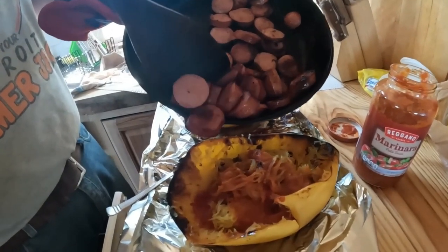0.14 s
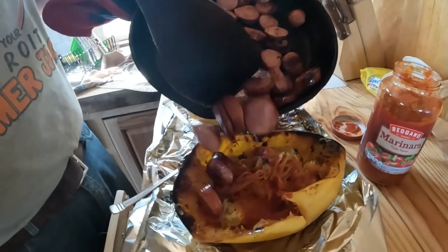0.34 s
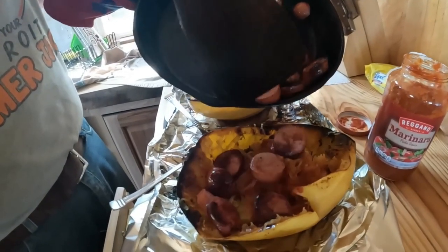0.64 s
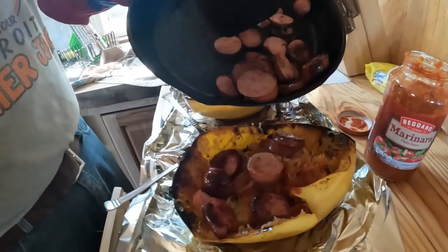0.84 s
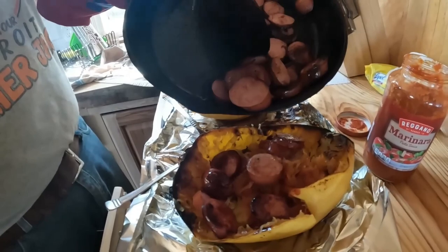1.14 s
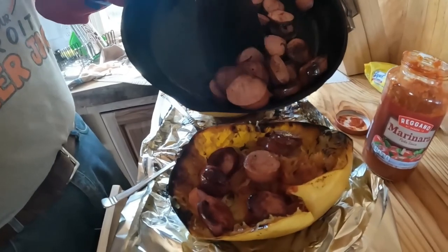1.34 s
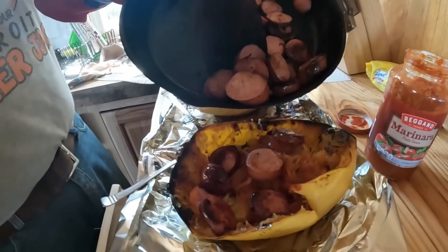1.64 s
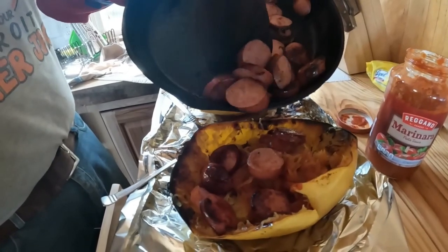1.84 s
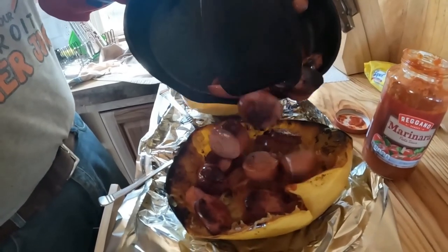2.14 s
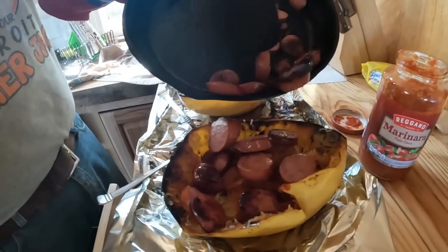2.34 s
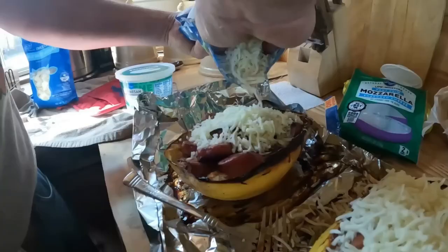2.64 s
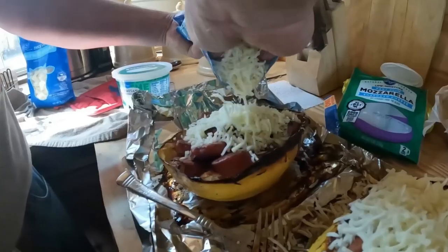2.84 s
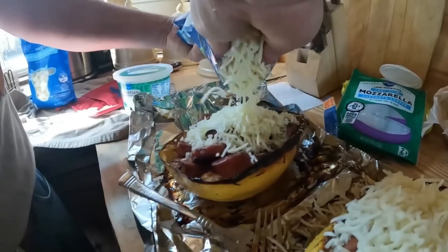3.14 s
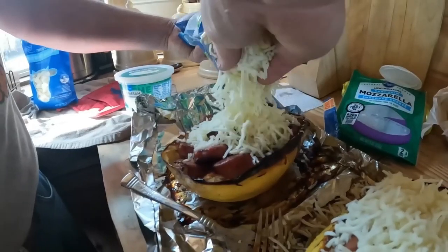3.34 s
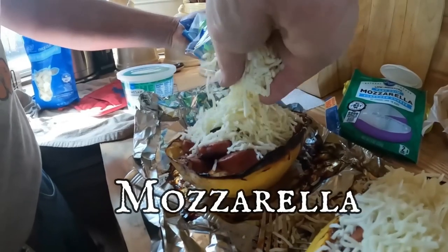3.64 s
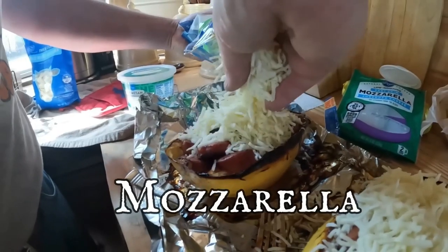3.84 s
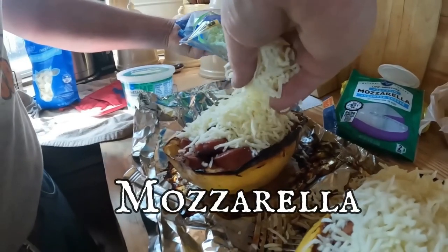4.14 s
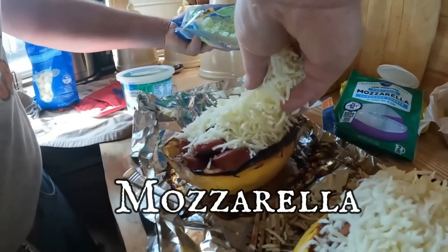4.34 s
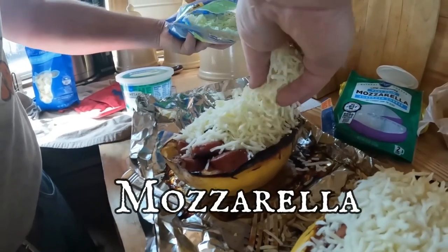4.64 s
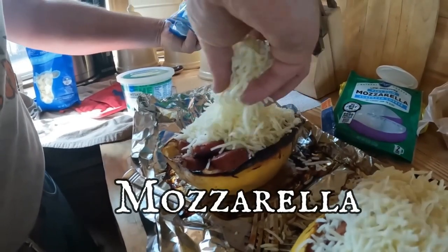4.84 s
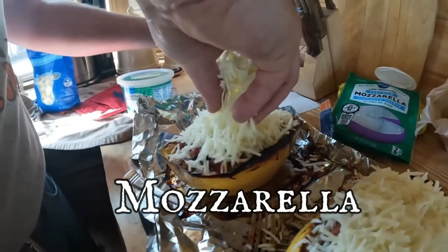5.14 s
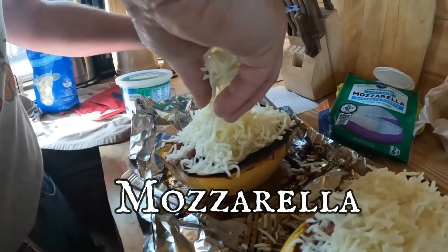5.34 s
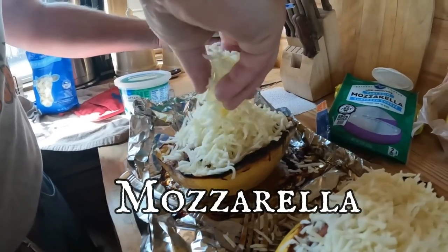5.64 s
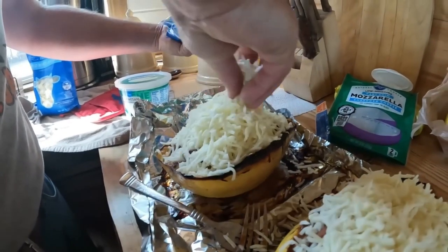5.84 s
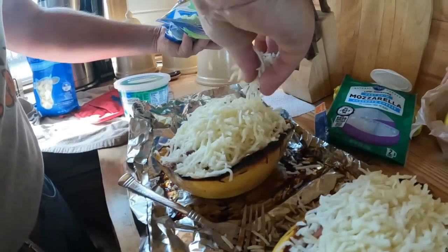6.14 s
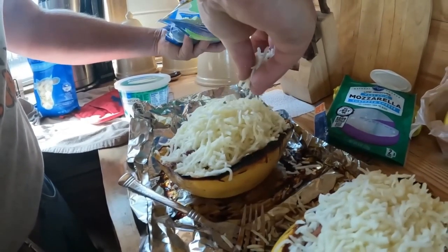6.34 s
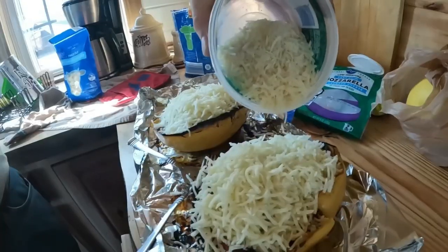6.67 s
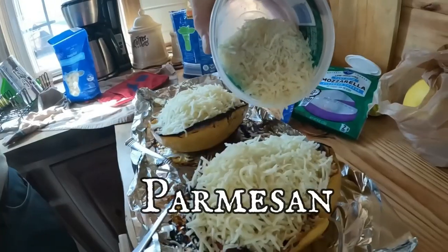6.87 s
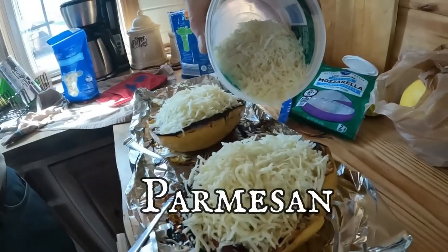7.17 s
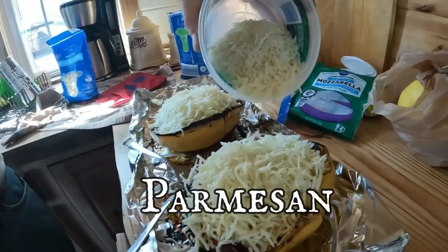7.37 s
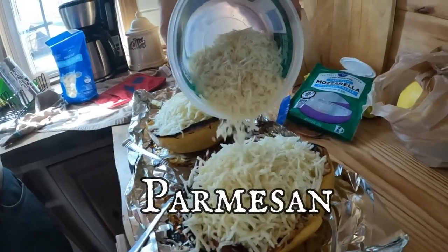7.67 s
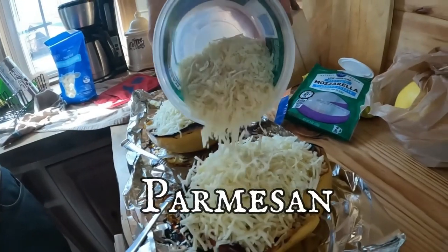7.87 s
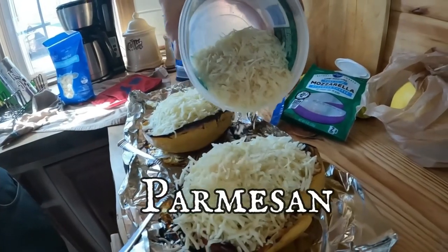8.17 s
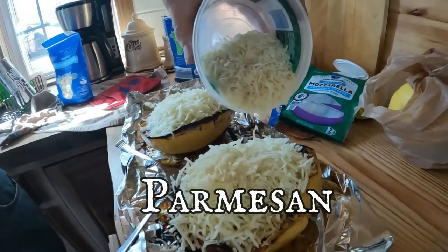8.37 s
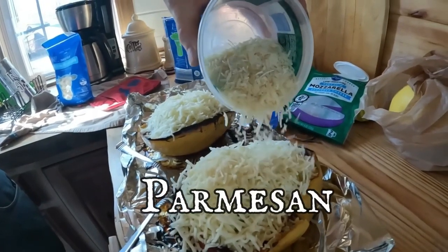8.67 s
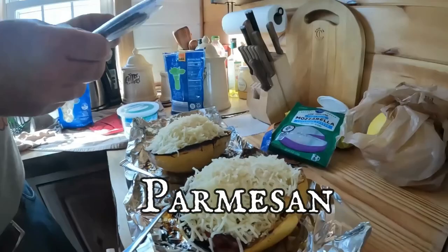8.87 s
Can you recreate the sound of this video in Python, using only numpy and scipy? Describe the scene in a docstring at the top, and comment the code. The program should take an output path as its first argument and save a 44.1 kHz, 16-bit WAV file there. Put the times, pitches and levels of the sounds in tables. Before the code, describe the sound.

Brief scrapes and ticks of a spoon in a pan come first, dry and slightly metallic, with one loud hollow knock. Then a hand works in a crinkly bag, giving busy mid-pitched snaps and papery rustle above foil. The crumpling stops, leaving near quiet, a heavy soft counter boom, and scattered crinkles. Recorded very close in stereo, with a short dry kitchen tail and soft low room rumble.

```python
"""Hands crumple a cheese bag over crinkly foil while, in the first seconds, a spoon scrapes and knocks a pan on
a kitchen counter. Snaps, of creases and of one spoon knock, are clicks that ring small facets; strokes rustle
as clumps of tiny slips plus hiss. Rubbing keeps the pan's modes humming; knocks, clangs and bumps are dying
modes of spoon, pan and counter. A short room tail, a wavering low rumble and still air lie underneath."""
import sys
import numpy as np
from scipy import signal
from scipy.fft import rfft, irfft
from scipy.io import wavfile

SR = 44100
rng = np.random.default_rng(int(sys.argv[2]) if len(sys.argv) > 2 else 0)


def unload_audio(sound):
    """Save the sound as a 16-bit wav file, at the path given as the first command line argument."""
    columns = np.transpose(np.atleast_2d(sound))
    # keep every value between -1 and 1, then stretch to whole-number steps
    steps = np.round(np.clip(columns, -1, 1) * 32767)
    wavfile.write(sys.argv[1], SR, steps.astype(np.int16))


def voltage_ratio(decibels):
    """Convert decibels (scalar or array-like) to amplitude ratios, 20 dB per decade."""
    exponent = np.asarray(decibels, float) / 20
    return 10 ** exponent


N = 397341
T = np.arange(N) / SR


def evened(x):
    """Scales to rms 1."""
    return x / np.sqrt(np.mean(x ** 2) + 1e-20)


def read(points, hz):
    """Reads a spectrum table on a log-frequency axis."""
    f, value = np.transpose(points)
    return np.interp(np.log(hz + 1), np.log(f + 1), value)


def add(mix, s, sound):
    """Mixes a sound in at s seconds."""
    part = mix[..., max(round(s * SR), 0):][..., :sound.shape[-1]]
    part += sound[..., :part.shape[-1]]


def registers(x):
    """Splits into body, middle and treble."""
    edges = [((400, 800), "band"), ((700, 4000), "band"), (4000, "high")]  # Hz
    return [signal.sosfilt(signal.butter(3, hz, kind, fs=SR, output="sos"), x) for hz, kind in edges]


def resonate(x, hz, width):
    """Resonance of gain 1 and a width in Hz, on a fixed or moving centre."""
    turn = np.exp(2j * np.pi * np.cumsum(hz * np.ones(x.shape[-1])) / SR)
    r = np.exp(-np.pi * width / SR)
    # shift the centre down to 0 Hz, smooth there, shift back up
    return 2 * (turn * signal.lfilter([1 - r], [1, -r], x / turn)).real


def struck(modes, tilt_db, contact):
    """Dying modes, tilted in dB an octave about 700 Hz, that build up over the contact time; peak 1."""
    t = T[:SR // 2]
    ring = np.zeros(len(t))
    for hz, db, t60 in modes:
        decay = voltage_ratio(db + tilt_db * np.log2(hz / 700) - 60 * t / t60)
        ring += decay * np.sin(2 * np.pi * hz * t)
    ring *= 1 - np.exp(-t / contact)
    return ring / abs(ring).max()


# How alike noise is in the two channels. Each row: frequency in Hz, likeness from 0 to 1.
LIKENESS = [(60, 0.97), (240, 0.19), (950, 0.1), (3770, 0.99), (15000, 0.6)]


def pair(points):
    """Two-channel noise of a given colour and rms 1; left and right are alike to a degree set by pitch."""
    hz = np.fft.rfftfreq(N, 1 / SR)
    a, b = rfft(rng.standard_normal((2, N)))
    same = np.clip(read(LIKENESS, hz), 0, 1)
    right = same * a + np.sqrt(1 - same ** 2) * b
    return evened(irfft(voltage_ratio(read(points, hz)) * np.array([a, right]), N))


# Colour of the still air. Each row: frequency in Hz, relative density in dB per Hz.
AIR_COLOUR = [(41, -29), (70, -9), (113, -9), (207, -7.5), (291, -2.5), (768, -30), (1050, -22),
              (2070, -35), (2850, -34.5), (3120, -39), (6720, -44), (12900, -47.5), (15500, -78)]


def still_air():
    """Steady faint noise at a fixed rms level."""
    return voltage_ratio(-59.5) * pair(AIR_COLOUR)


# Level of the rumble over time. Each row: time in seconds, rms level in dB before the waver.
RUMBLE_LEVEL = [(0.0, -41.5), (0.48, -48.5), (0.7, -41.5), (1.33, -47.5), (1.55, -48.5), (1.81, -48.5),
                (2.43, -50), (2.78, -44), (4.04, -54), (4.54, -50), (6.5, -52), (6.73, -45), (7.3, -54.5),
                (7.5, -41), (7.68, -42.5), (7.88, -49), (8.08, -45), (8.28, -52), (8.51, -48.5),
                (9.01, -48)]
# Colour of the rumble. Each row: frequency in Hz, relative density in dB per Hz.
RUMBLE_COLOUR = [(4.7, -16), (8.0, 2.5), (16, -3), (26, -7), (51, -9), (81, -38.5), (120, -35.5),
                 (160, -66.5), (260, -120)]


def rumble():
    """Low room rumble whose level wavers with a sum of slow sines from 1 to 8 Hz."""
    waver = np.zeros(N)
    for f in np.geomspace(1, 8, num=16):
        waver += np.sin(2 * np.pi * (f * T + rng.random())) / np.sqrt(f)
    waver_db = 2.5 * evened(waver)
    return voltage_ratio(np.interp(T, *np.transpose(RUMBLE_LEVEL)) + waver_db) * pair(RUMBLE_COLOUR)


def room(x):
    """Short kitchen tail from sparse taps of random sign, different left and right."""
    at = np.arange(120, SR // 3, 20)
    places = at + rng.integers(0, 20, (2, len(at)))
    signs = rng.choice([-1., 1.], (2, len(at)))
    taps = np.zeros((2, SR // 3 + 20))
    np.put_along_axis(taps, places, signs, 1)
    taps *= voltage_ratio(-60 * T[:taps.shape[1]] / 0.12)  # t60 0.12 s
    return signal.oaconvolve(x, taps / np.linalg.norm(taps[0]), axes=1)[:, :N]


# Modes of the counter. Each row: frequency in Hz, level in dB before the tilt, t60 in seconds.
COUNTER_MODES = [(41.8, 9.5, 0.29), (59.26, 2.5, 0.58), (94.9, 1, 0.33), (137.3, -1.5, 0.34),
                 (177.6, -18, 0.37), (207, -18, 0.27), (247, -29, 0.073)]
# Bumps against the counter. Each row: start in seconds, peak in dB, contact time in seconds,
# tilt in dB an octave.
BUMPS = [(1.44, -40, 0.002, 20), (2.799, -36.5, 0.0017, 19), (3.318, -36.5, 0.0032, 23),
         (3.336, -45, 0.0034, 22), (3.464, -34.5, 0.0043, 24), (3.798, -41.5, 0.0071, 19),
         (4.757, -42.5, 0.0055, 6), (7.71, -15.5, 0.01, 5.5), (7.736, -10.5, 0.0028, 3.5),
         (7.916, -24, 0.02, 1), (8.484, -33, 0.011, -7.5)]


def bumps():
    """The counter booms in its low modes when bumped, pushed the opposite way to the other blows."""
    out = np.zeros(N)
    for s, db, contact, tilt_db in BUMPS:
        add(out, s, -voltage_ratio(db) * struck(COUNTER_MODES, tilt_db, contact))
    return out


# Modes of the pan. Each row: frequency in Hz, level in dB, t60 in seconds when ringing freely.
PAN_MODES = [(980, -11.5, 0.33), (1460, 1, .12), (1710, -17, 0.34), (2515, 0.5, 0.055), (2950, -1, 0.096),
             (3740, -8.5, 0.17), (4650, -22.5, 0.14), (4430, -24, 0.28), (5500, -10.5, 0.28),
             (5400, -25, .1)]
# The pan set ringing. Each row: start in seconds, peak in dB, tilt in dB an octave,
# contact time in seconds.
CLANGS = [(0.429, -45, 0.5, 0.0052), (0.594, -48, 5, 0.0013), (1.16, -45, 4, 0.0022),
          (1.524, -33, -4, 0.00076), (2.0, -58, 21, 0.015), (2.079, -51, -9, 0.011),
          (2.652, -35.5, -3.5, 0.024)]


def clangs():
    """The pan rings freely in its own modes."""
    out = np.zeros(N)
    for s, db, tilt_db, contact in CLANGS:
        add(out, s, voltage_ratio(db) * struck(PAN_MODES, tilt_db, contact))
    return out


# Modes of the wooden spoon. Each row: frequency in Hz, level in dB before the tilt,
# t60 in seconds before the grip.
SPOON_MODES = [(565, 15, 0.075), (532, -6.5, 0.31), (629, -45, 0.034), (1010, 11.5, 0.062),
               (1070, -5, 0.079), (2480, -28, 0.022)]
# Spoon knocks. Each row: start in seconds, peak in dB, tilt in dB an octave,
# contact time in seconds, looseness of grip as a factor on t60.
KNOCKS = [(1.3616, -11.5, 9.5, 0.00061, 0.88), (1.5243, -33, -13, 0.0008, 2.7)]


def knocks():
    """The wooden spoon knocks; a looser grip lets its modes ring longer."""
    out = np.zeros(N)
    for s, db, tilt_db, contact, loose in KNOCKS:
        add(out, s, voltage_ratio(db) * struck(np.array(SPOON_MODES) * [1, 1, loose], tilt_db, contact))
    return out


def scrape(rubbing):
    """While the spoon works the pan, the rubbing keeps the pan's modes humming, damped by the food."""
    end_s, hum_db = 2.76, 2.5  # the pan is put away at end_s
    food_damping = 3.76  # resonance width in Hz times free t60; undamped would be 2.2
    held = rubbing.mean(0) * (T < end_s)
    hum = sum(voltage_ratio(db) * resonate(held, hz, food_damping / t60) for hz, db, t60 in PAN_MODES)
    return voltage_ratio(hum_db) * hum


# Colour of the crumpled sheet. Each row: frequency in Hz, level in dB per Hz.
SHEET_COLOUR = [(71, -41), (120, 8), (271, 11), (398, -9), (441, -11.5), (704, -14.5), (917, -1.5),
                (1430, -2.5), (4570, -5.5), (4860, -5.5), (7300, -13), (13400, -31), (15500, -43.5)]


def sheet_response():
    """Minimum-phase impulse response of the sheet: its colour with no ringing ahead of the hit."""
    level_db = np.maximum(read(SHEET_COLOUR, np.fft.rfftfreq(4096, 1 / SR)), -100)
    half = np.log(voltage_ratio(level_db))
    full = np.r_[half, half[-2:0:-1]]
    return np.fft.ifft(np.exp(full - 1j * signal.hilbert(full).imag)).real[:2048]


IDLE_HZ, IDLE_TREBLE_DB = 1250, -6.5  # hollow and treble of the sheet between strokes
# Faint shifting between strokes. Each row: time in seconds, effort in dB.
IDLE_EFFORT = [(0, -67), (.8, -79), (1.1, -78), (1.5, -62), (2.6, -70), (3.0, -60.5), (5.4, -75),
               (5.7, -83.5), (6.3, -77.5), (6.5, -84), (6.9, -89.5), (7.5, -69.5), (8.3, -65.5),
               (9.01, -66)]
# Strokes of spoon or hand. Each row: start in seconds, length in seconds, effort in dB,
# hollow of the folds in Hz, treble over 4 kHz in dB.
STROKES = [(0, 0.018, -45.5, 2260, 0), (0.06, 0.18, -65.5, 2800, 10.5), (0.361, 0.16, -57.5, 1450, 0),
           (0.489, 0.041, -50.5, 1980, -3), (0.52, .07, -62, 905, -1), (0.761, 0.037, -63, 3260, 8.5),
           (1.13, 0.16, -54, 2400, -2), (1.328, 0.07, -56, 1070, -8), (1.469, 0.1, -44, 1490, 0.5),
           (1.593, 0.088, -49, 1940, -7), (1.72, 0.034, -56, 1680, -2), (1.878, 0.12, -63, 3040, 11),
           (2.039, 0.12, -57.5, 1290, 6.5), (2.19, 0.098, -57, 2850, -15), (2.477, 0.043, -64.5, 1900, 8),
           (2.55, 0.047, -62.5, 2000, 4.5), (2.635, .11, -51.5, 1430, 2), (2.787, 0.11, -41, 1680, -10),
           (2.849, 0.11, -45, 1500, -8.5), (2.992, .08, -49, 1500, -26), (3.092, 0.37, -63.5, 1480, -4),
           (3.27, 0.2, -52.5, 2100, -11), (3.377, 0.18, -54, 1630, -6), (3.445, 0.14, -44, 1600, -21),
           (3.599, 0.069, -39, 1250, -16), (3.709, 0.036, -41.5, 1380, -5), (3.765, 0.21, -36.5, 1270, -8),
           (4.002, 0.082, -55, 1340, -17), (4.172, 0.12, -48.5, 1160, -18),
           (4.266, 0.073, -47.5, 2020, -14), (4.356, 0.031, -51, 1440, -25), (4.453, 0.11, -54, 1370, -16),
           (4.595, 0.025, -55, 1450, -24), (4.658, 0.094, -40, 1420, -7.5), (4.719, 0.1, -36, 1370, -10.5),
           (4.845, .21, -40.5, 1440, -11), (5.068, 0.21, -57.5, 1530, -17), (5.249, 0.17, -50.5, 1470, -14),
           (5.344, 0.089, -52, 1240, -9), (5.468, 0.056, -56, 1700, -14), (5.552, 0.062, -61.5, 1750, -25),
           (5.673, 0.026, -60.5, 2900, 6), (5.747, .09, -52, 3600, -10), (5.897, .04, -60.5, 1170, 2),
           (5.959, 0.14, -41, 1410, -4.5), (6.125, 0.06, -51, 1170, -10.5), (6.196, .07, -49.5, 1350, -10),
           (6.273, 0.11, -63, 1480, -21), (6.554, 0.071, -55, 1310, -4), (6.598, 0.068, -55, 970, -11),
           (6.704, 0.099, -75, 2080, 6), (7.14, 0.1, -65, 1150, -4), (7.27, 0.41, -68.5, 1600, -16),
           (7.584, 0.13, -55, 1070, -9), (7.713, 0.11, -48.5, 1320, -12), (7.914, 0.11, -57, 1300, -6.5),
           (8.013, 0.17, -67.5, 1100, 1), (8.176, 0.057, -57.5, 2200, 2), (8.337, 0.043, -48, 1900, -12),
           (8.392, 0.069, -58.5, 3200, 1), (8.592, 0.057, -53, 2600, 1.5), (8.626, 0.14, -54, 1000, -10),
           (8.919, .12, -45.5, 2100, -3.5)]


def hand():
    """Stroke efforts summed in power; hollow and treble are averages that lean to the strongest stroke."""
    rise_s, sag_db, release_db_per_s = .015, -5, 401  # each stroke swells, tires a little and lets go
    power = voltage_ratio(2 * np.interp(T, *np.transpose(IDLE_EFFORT)))
    sums = np.array([power, power * IDLE_HZ, power * voltage_ratio(IDLE_TREBLE_DB)])
    t = T[:SR // 2]
    for s, length, db, hz, treble_db in STROKES:
        fall_db = sag_db * np.minimum(t / length, 1) - release_db_per_s * np.maximum(t - length, 0)
        effort = np.minimum(t / rise_s, 1) * voltage_ratio(db + fall_db)
        add(sums, s, np.outer([1, hz, voltage_ratio(treble_db)], effort ** 2))
    return np.sqrt(sums[0]), sums[1] / sums[0], sums[2] / sums[0]


# Weight of the separate slips against a steady weight of hiss. Each row: time in seconds, weight.
CRISPNESS = [(0, 0.61), (2.7, 0.26), (2.78, 0.57), (6.35, 0.8), (6.45, 0.48), (9.01, 0.36)]


def rustle(sheet):
    """Dense tiny slips in clumps, ringing facets of many sizes, under the hand's effort."""
    effort, hollow_hz, bright = hand()
    body_db = -2.5 - 9 * np.log2(hollow_hz / IDLE_HZ)  # higher hollows have less body
    clumps = evened(signal.lfilter([1], [1, -.997], rng.standard_normal(N)))
    slips, t = np.zeros((2, N)), T[:1200]
    for hz in np.geomspace(250, 12000, num=32):
        happens = rng.random(N) < 70 / SR  # about 70 slips a second for each facet pitch
        size = voltage_ratio(2.5 * np.minimum(rng.exponential(1, N), 5) + 3.8 * clumps) * happens
        facet = np.sin(2 * np.pi * hz * t) * np.exp(-np.pi * .09 * hz * t)
        grain = rng.standard_normal(len(t)) * voltage_ratio(-60 * t / 0.038)
        slip = facet / np.linalg.norm(facet) + .45 * grain / np.linalg.norm(grain)
        side = voltage_ratio(2.7 * rng.standard_normal())  # each facet pitch sits off-centre
        slips += signal.oaconvolve(size, slip)[:N] * np.array([[side], [1 / side]])
    hiss = pair([(100, 0.047), (16000, 0.0045)]) * voltage_ratio(3.4 * clumps)  # nearly white: (Hz, dB)
    crisp = np.interp(T, *np.transpose(CRISPNESS))
    drive = crisp * evened(slips) + 0.77 * hiss
    body, middle, treble = registers(signal.oaconvolve(drive, sheet[None], axes=1)[:, :N])
    hollow = evened(resonate(drive, hollow_hz, 300))
    middle = evened(evened(middle) + 0.48 * hollow)
    return effort * (middle + voltage_ratio(body_db) * evened(body) + bright * evened(treble))


# Clicks: creases popping, and the click of the spoon knock at 1.361 s. Each row: start in seconds,
# peak in dB before panning, ringing in Hz, extra brightness in dB, t60 of the shaking in seconds.
SNAPS = [(0.088, -38.5, 2180, -3, 0.043), (0.159, -37.5, 2930, -6, 0.039), (0.431, -50, 1460, 6, 0.035),
         (0.504, -32.5, 5200, -12, 0.051), (0.516, -36.5, 1920, 3.5, 0.055), (0.597, -33.5, 1480, 8, 0.018),
         (0.652, -20.5, 6200, 5.5, 0.072), (0.658, -21, 5940, -3, 0.029), (0.78, -36, 5360, 2, 0.035),
         (1.152, -43, 2850, 17, 0.031), (1.154, -30.5, 2940, 2, 0.054), (1.209, -37.5, 3130, 0.5, 0.053),
         (1.361, -21, 1030, 5.5, 0.026), (1.435, -35, 1000, 9, 0.052), (1.468, -36, 1050, 6, 0.026),
         (1.564, -27, 2960, 0.1, 0.031), (1.729, -43, 2940, -3, 0.05), (2.077, -46, 1100, 10, 0.035),
         (2.193, -34.5, 3200, -5.5, 0.03), (2.211, -37, 2920, 9, 0.052), (2.246, -41.5, 2950, -1, 0.052),
         (2.282, -41, 2200, -1, 0.042), (2.331, -25.5, 3340, 2, 0.013), (2.484, -42, 6610, -7, 0.038),
         (2.735, -34.5, 2960, -5, 0.048), (2.78, -32.5, 1650, -9, 0.032), (2.802, -18.5, 1924, -1, 0.033),
         (2.826, -26, 2080, -8, 0.038), (2.855, -31, 1390, 2, 0.035), (2.879, -21.5, 1460, 1.5, 0.053),
         (2.942, -37, 1420, 0.1, 0.028), (3.016, -19, 1550, -3.5, 0.026), (3.033, -27.5, 1380, -5, 0.03),
         (3.065, -34.5, 1430, -2, 0.035), (3.148, -36.5, 1520, 1.5, 0.038), (3.256, -37, 950, -2, 0.029),
         (3.32, -18, 2060, 0.5, 0.015), (3.391, -42, 1340, 0.1, 0.035), (3.462, -19.5, 1510, 1, 0.025),
         (3.471, -28, 950, 3, 0.024), (3.519, -17.5, 1840, -1.5, 0.035), (3.547, -21, 2900, -10.5, 0.035),
         (3.625, -30.5, 1280, 12, 0.024), (3.649, -26, 1330, 1, 0.062), (3.721, -17.5, 1400, 2.2, 0.083),
         (3.781, -21, 990, 0.1, 0.052), (3.813, -21.5, 1400, 3.5, 0.028), (3.821, -17.5, 1430, -6, 0.029),
         (3.832, -24.5, 1030, 6, 0.028), (3.845, -19.5, 923, 3, 0.029), (3.869, -31, 960, 2, 0.035),
         (3.892, -33, 2130, -15, 0.059), (3.911, -30, 1890, -3, 0.046), (3.933, -22.5, 930, 5.5, 0.066),
         (3.967, -30, 910, -7, 0.035), (3.979, -34.5, 900, -1, 0.041), (4.028, -27, 1400, -6, 0.027),
         (4.121, -44.5, 1470, -3, 0.047), (4.184, -34, 865, -4, 0.035), (4.193, -29, 1390, -1.5, 0.035),
         (4.229, -24, 890, -1, 0.061), (4.249, -27, 1410, -6, 0.046), (4.285, -23.5, 1960, 4.5, 0.062),
         (4.309, -39, 920, 11, 0.027), (4.366, -32.5, 1450, -4, 0.045), (4.45, -34.5, 1280, -5, 0.028),
         (4.504, -32, 1510, 3.5, 0.073), (4.524, -36, 890, 5, 0.038), (4.604, -39.5, 1410, -10, 0.029),
         (4.671, -19.5, 1330, 1.5, 0.024), (4.703, -15.5, 1430, -4, 0.055), (4.753, -18, 1460, 1, 0.1),
         (4.778, -20, 1310, -3, 0.055), (4.788, -22, 1600, 0.1, 0.059), (4.855, -33, 1360, -8, 0.035),
         (4.873, -21.5, 1290, -8, 0.044), (4.892, -17.5, 1410, 3, 0.071), (4.938, -21, 1410, -2, 0.042),
         (4.973, -24, 990, 0.1, 0.042), (4.998, -28, 1290, 2, 0.041), (5.034, -29, 1130, 9, 0.029),
         (5.185, -40.5, 1360, -6, 0.064), (5.256, -33, 1460, 4, 0.042), (5.281, -36.5, 1360, -20, 0.044),
         (5.316, -26.5, 3600, -2.5, 0.038), (5.351, -29, 1640, -11, 0.047), (5.36, -25.5, 1010, -3, 0.021),
         (5.406, -36.5, 3330, 1, 0.039), (5.47, -28, 1510, -7, 0.028), (5.48, -32, 1230, 6, 0.026),
         (5.51, -33, 2690, 0.1, 0.014), (5.517, -17, 1720, -6.5, 0.035), (5.56, -33, 1370, 0.1, 0.046),
         (5.684, -25.5, 4400, -3, 0.035), (5.715, -34, 5840, 4, 0.041), (5.764, -24.5, 3760, -2, 0.05),
         (5.901, -45.5, 931, -14, 0.035), (5.972, -17, 1660, 1.5, 0.038), (6.019, -16.5, 1370, 5, 0.073),
         (6.05, -17.5, 1430, -2, 0.032), (6.081, -21, 1350, -6, 0.063), (6.153, -32.5, 920, -5, 0.035),
         (6.21, -21, 1670, -11, 0.039), (6.224, -23.5, 1800, -3.5, 0.055), (6.258, -37, 1770, -2, 0.035),
         (6.307, -44, 1410, -15, 0.035), (6.565, -26, 1400, 2, 0.049), (6.734, -53, 4230, -15, 0.041),
         (7.666, -38.5, 1000, -3, 0.035), (7.74, -37, 1130, -13, 0.067), (7.863, -49, 942, -1, 0.032),
         (7.989, -46.5, 1160, -5, 0.03), (8.346, -21.5, 2200, 5.5, 0.043), (8.354, -26.5, 1810, 4, 0.043),
         (8.397, -28, 3550, 2, 0.059), (8.404, -30, 2220, 3, 0.072), (8.67, -36.5, 1010, -3, 0.035),
         (8.688, -39, 980, -1, 0.058), (8.881, -44, 1550, -4, 0.035), (8.921, -35.5, 1920, 7.5, 0.056),
         (8.935, -33.5, 2150, 4.5, 0.049)]


def snaps(sheet):
    """Each crease, and one spoon knock, clicks, rings a facet a few cycles, then shakes the sheet briefly."""
    out, t = np.zeros((2, N)), T[:4000]
    rise = 1 - np.exp(-t / .0003)
    opposite = np.array([[1], [-1]])  # left, right
    for s, db, hz, bright_db, t60 in SNAPS:
        shaking = voltage_ratio(-60 * t / t60) + voltage_ratio(-11.0 - 60 * t / 0.14)  # main decay and a faint longer one
        burst = rng.standard_normal(len(t)) * shaking * rise
        burst[8] += 7.0  # the click
        burst = signal.fftconvolve(burst, sheet)[:len(t)]
        # six neighbouring facets, 500 to 12000 Hz, colour each click
        neighbours = sum(resonate(burst, f, .06 * f) for f in 500 * 24 ** rng.random(6))
        body, middle, treble = registers(burst + 1.1 * neighbours)
        facet = np.sin(2 * np.pi * hz * t) * np.exp(-np.pi * .11 * hz * t) * rise
        coloured = evened(resonate(burst, hz, 0.6 * hz))
        sound = evened(0.43 * evened(middle) + .5 * coloured + 0.64 * evened(facet))
        # small facets ring high, thin and bright; dull ones are heavy
        octaves = np.log2(hz / 1500)
        sound += voltage_ratio(-9 - 9.5 * octaves - 0.38 * bright_db) * evened(body)
        sound += voltage_ratio(-10 + 9.5 * octaves + bright_db) * evened(treble)
        pan_db = 1.5 * (rng.random() - .5) * opposite
        apart = 0.27 * evened(neighbours) * opposite  # the facets face the two capsules differently
        add(out, s, voltage_ratio(db + pan_db) * (sound + apart) / abs(sound).max())
    return out


def scene():
    """Snaps, rustle and scraping in the room, then blows, rumble and still air."""
    sheet = sheet_response()
    rubbing = rustle(sheet)
    near = snaps(sheet) + rubbing + scrape(rubbing)
    blows = knocks() + clangs() + bumps()
    return near + voltage_ratio(-18) * room(near) + blows + rumble() + still_air()


def low_pass(x):
    """Removes everything above the highest recorded frequency."""
    return signal.sosfilt(signal.butter(12, 15830, fs=SR, output="sos"), x)


# Gain of the left-right difference. Each row: frequency in Hz, gain in dB.
WIDTH = [(30, 7.5), (300, -11.5), (700, -13), (1500, -6), (3000, -0.5), (6000, -4), (14000, -3)]
# Lean of the pair to the left. Each row: frequency in Hz, left over right in dB.
LEAN = [(60, 0), (600, 0), (1300, -.9), (3000, -.4), (9000, 1), (14000, 2.5)]


def record(dry):
    """Two close capsules whose width and lean change with pitch."""
    hz = np.fft.rfftfreq(N, 1 / SR)
    left, right = rfft(dry)
    mid = (left + right) / 2
    side = (left - right) / 2 * voltage_ratio(read(WIDTH, hz))
    lean = voltage_ratio(read(LEAN, hz) / 2)  # half the lean on each channel
    mix = irfft(np.array([(mid + side) * lean, (mid - side) / lean]), N)
    return low_pass(mix)


dry = scene()
out = record(dry)
unload_audio(out)
```